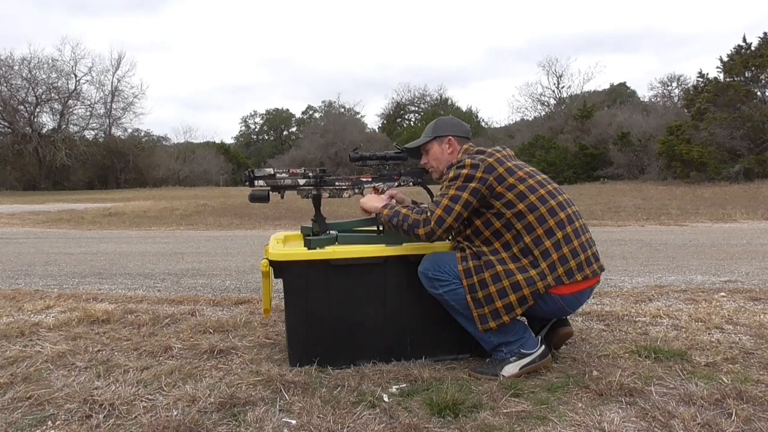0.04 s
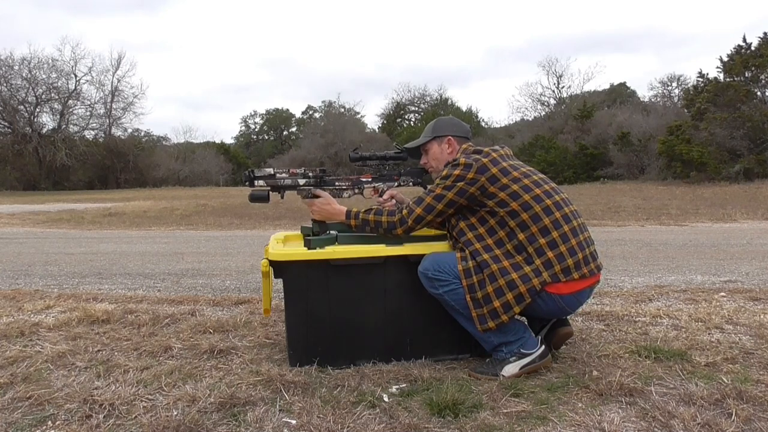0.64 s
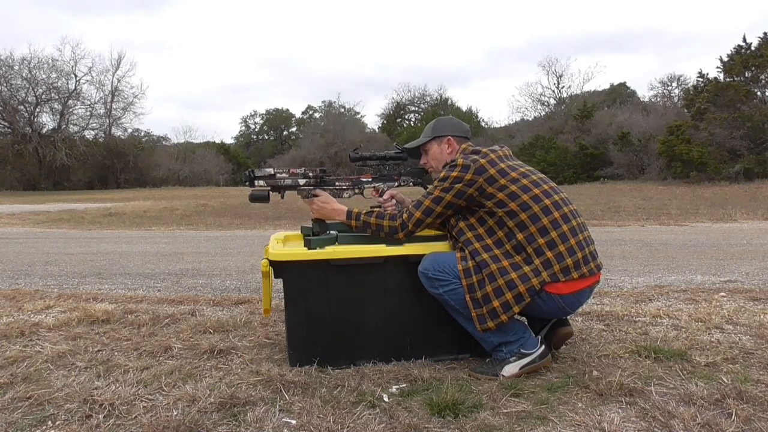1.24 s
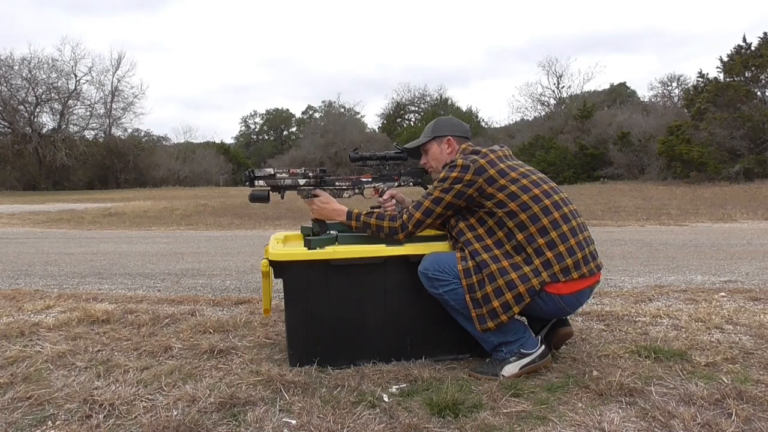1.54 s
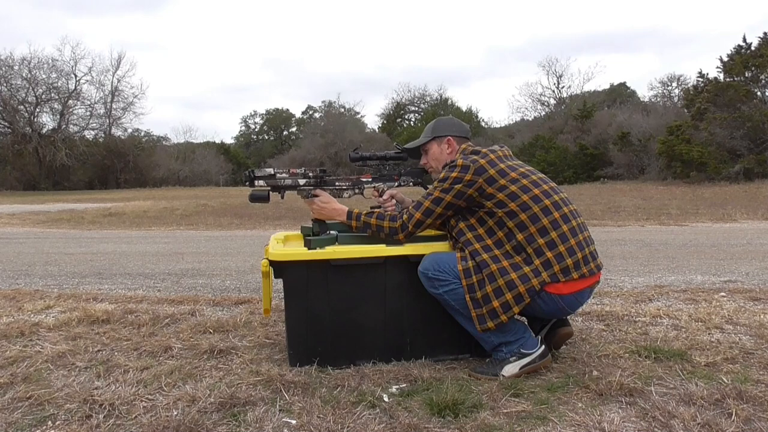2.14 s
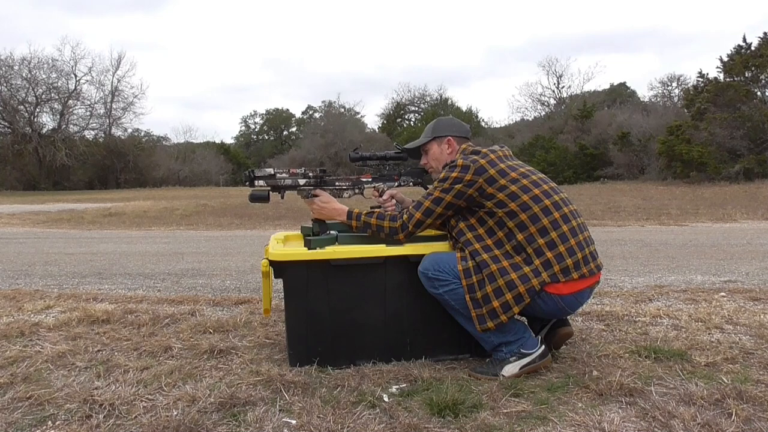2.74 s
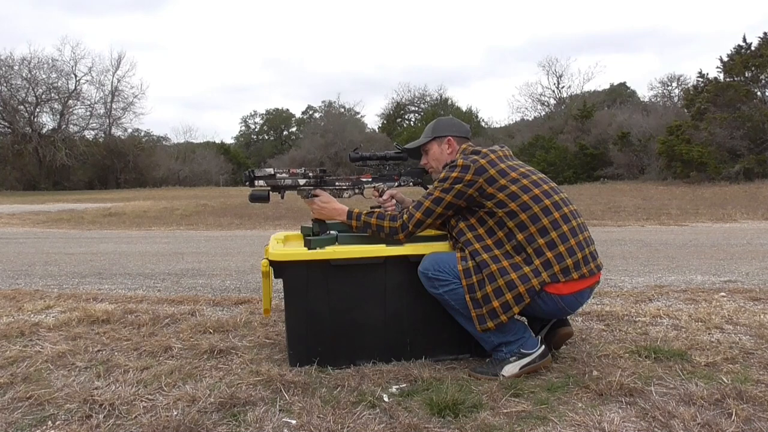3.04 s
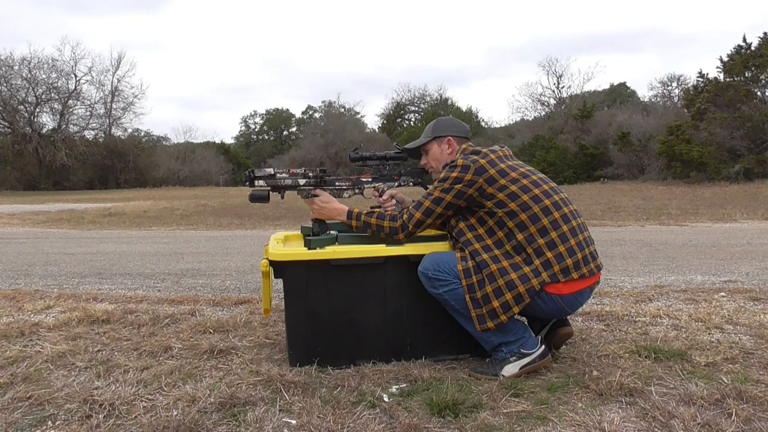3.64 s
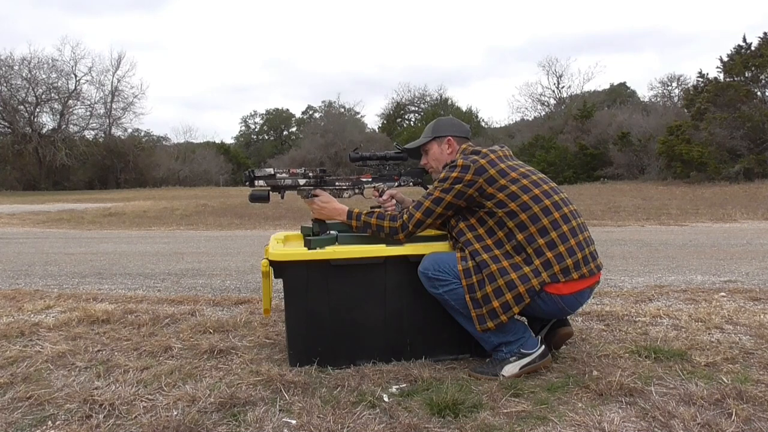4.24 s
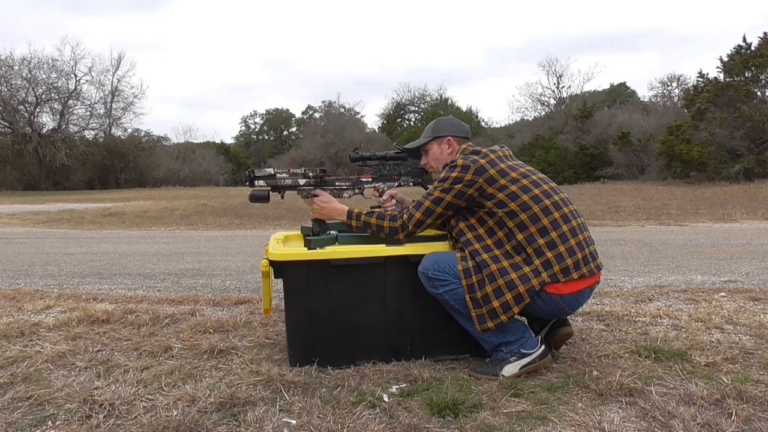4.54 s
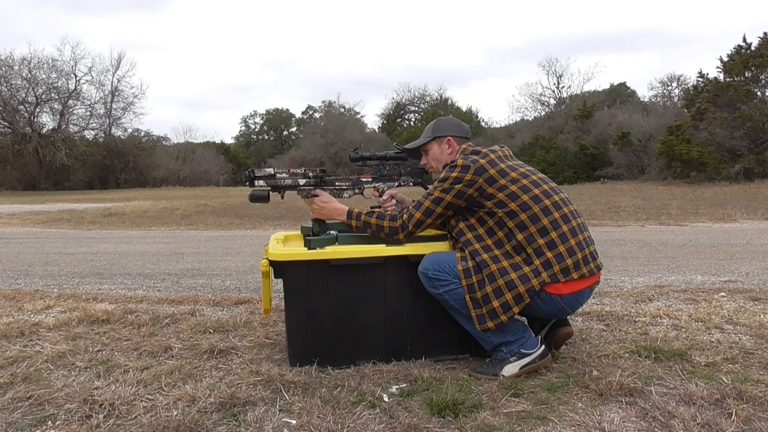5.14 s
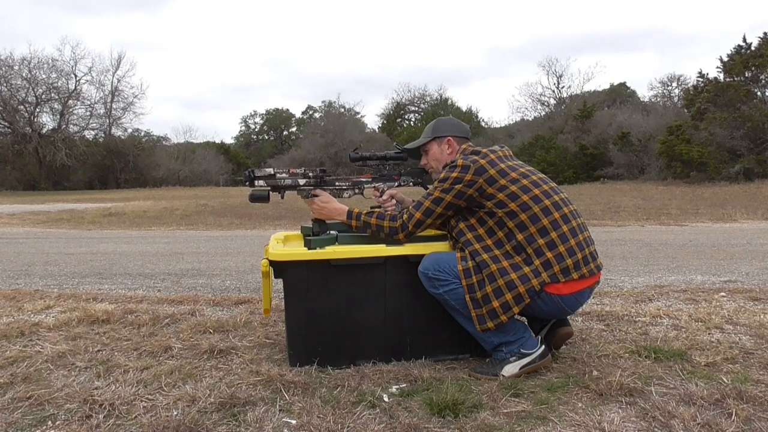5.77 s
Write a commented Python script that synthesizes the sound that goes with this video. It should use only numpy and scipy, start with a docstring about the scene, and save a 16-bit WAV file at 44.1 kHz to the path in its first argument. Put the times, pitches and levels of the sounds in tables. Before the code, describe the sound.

Engine hum and tyre noise fade gently in the open air until a nearby crossbow shoots once with a bright snap and thump.

```python
"""A vehicle drones on a country road off to the right, then slowly recedes: exhaust harmonics over
throbbing rumble and tyre noise. A second engine revs briefly, clothing rustles close by on the right,
and a small bird chips, echoed by the trees. At the very end a crossbow fires, a few metres ahead:
quick impacts excite the modes of latch and rail in a bright snap, and those of the limbs in a thump."""
import sys
import numpy as np
from scipy import signal
from scipy.fft import rfft, irfft
from scipy.io import wavfile

SR = 44100
rng = np.random.default_rng(int(sys.argv[2]) if len(sys.argv) > 2 else 0)


def digitize_waveform(pressure):
    """Quantize a signal to 16-bit integers and store it at the path in sys.argv[1].

    Rows of a 2-D input are taken as channels; values are limited to [-1, 1].
    """
    field = np.atleast_2d(pressure).T
    bounded = np.clip(field, -1, 1)
    quanta = np.round(bounded * 32767).astype(np.int16)
    wavfile.write(sys.argv[1], SR, quanta)


N = 260532
TIME = np.arange(N) / SR

# broad surges of the vehicle's noise: t/s, rasp gain/dB, tyre gain/dB, half-width/s
NOISE_SURGES = [(0.043, 8.5, 2.5, 0.57), (1.966, 4.5, 1.5, 0.31), (2.9, 0.5, 2, 0.95)]


def amp(db):
    """Amplitude ratio of a level in decibels."""
    return 10 ** (np.asarray(db) / 20)


def unit(x):
    """Normalisation to rms 1."""
    return x / np.sqrt(np.mean(x ** 2) + 1e-20)


def read(points, hz):
    """Interpolation on a logarithmic frequency axis."""
    f, value = np.transpose(points)
    return np.interp(np.log(hz + 1), np.log(f + 1), value)


def hold(start_s, length_s, attack_s, release_s):
    """Trapezoidal envelope: rise, plateau and fall to silence."""
    age = TIME - start_s
    return np.clip(age / attack_s, 0, 1) * np.clip((length_s - age) / release_s, 0, 1)


def bump(s, half_s):
    """Gaussian envelope of height 1 around time s."""
    return np.exp(-((TIME - s) / half_s) ** 2)


def burst(s, decay_s, rise_s=0.00049):
    """Impact envelope: quick rise, exponential decay."""
    age = np.maximum(TIME - s, 0)
    return (1 - np.exp(-age / rise_s)) * np.exp(-np.minimum(age / decay_s, 20))


def wander(rate_hz):
    """Random fluctuation: low-pass Gaussian noise of rms 1."""
    hz = np.fft.rfftfreq(N, 1 / SR)
    return unit(irfft(rfft(rng.standard_normal(N)) * np.exp(-(hz / rate_hz) ** 2), N))


def noise(spectrum, coherence=None):
    """Partially coherent stereo noise of rms 1; the spectrum sets only its colour."""
    # likeness of the channels for sound from one side: f/Hz, coherence (0-1)
    lateral_coherence = [(60, 1), (220, 0.87), (430, 0.65), (700, 0.7), (1000, 1), (1600, 0.72),
                         (2500, 0.2), (5000, 0.42), (10000, 0.35), (14000, 0)]
    hz = np.fft.rfftfreq(N, 1 / SR)
    a, b = rfft(rng.standard_normal((2, N)))
    same = np.clip(read(lateral_coherence if coherence is None else coherence, hz), 0, 1)
    mid, side = a * np.sqrt(1 + same), b * np.sqrt(1 - same)
    return unit(irfft(np.array([mid + side, mid - side]) * amp(read(spectrum, hz)), N))


def hiss(level_db=-70, whine_hz=12100, whine_db=-81):
    """Self-noise of the microphones: nearly incoherent, but for one narrow band that both share."""
    # self-noise spectrum: f/Hz, relative density/dB
    floor = [(1180, -35), (2000, 3), (2200, 3), (2420, -8.5), (3710, -2), (4260, -4.5), (4640, -3.5),
             (5240, -9), (6220, -9), (8260, 0), (10600, 0.5), (11400, 1.5), (12100, -2.5), (12900, 1),
             (15600, -9.5)]
    band = [(whine_hz + df, db) for df, db in [(-700, -60), (-250, -7), (0, 0), (250, -7), (700, -60)]]
    broadband = amp(level_db) * noise(floor, [(2000, 0.11), (14000, 0.087)])
    return broadband + amp(whine_db) * noise(band, [(whine_hz, 0.9)])


def bird(sweep=0.2, settle_s=0.0076, rasp=0.03, twigs_db=-3, twigs_s=0.016, trees_db=-7, trees_t60=0.62):
    """Frequency modulation gives raspy upswept chips; twigs scatter them, the tree line reverberates."""
    # chips: t/s, level/dB, top f/Hz, duration/s
    chips = [(0.101, -65.5, 7500, 0.045), (1.589, -53, 7680, 0.049), (1.972, -70, 7500, 0.031),
             (3.672, -69.5, 7670, 0.044), (5.056, -74, 7800, .024)]
    song = np.zeros(N)
    for s, db, top_hz, length in chips:
        age = np.clip(TIME - s, 0, length)
        hz = top_hz * (1 - sweep * np.exp(-age / settle_s)) * (1 + rasp * wander(700))
        song += amp(db) * np.sin(np.pi * age / length) * np.sin(2 * np.pi * np.cumsum(hz) / SR)
    t = TIME[:SR // 2]
    twigs, trees = rng.standard_normal((2, 2, len(t)))
    echo = amp(twigs_db) * unit(twigs * np.exp(-t / twigs_s))
    echo += amp(trees_db) * unit(trees * amp(-60 * t / trees_t60))
    return song + signal.fftconvolve(song[None], echo / np.sqrt(len(t)), axes=1)[:, :N]


def doublings(nearest_s=0.92, road_m=30.9, speed_m_per_s=15.6):
    """Straight-line motion: the vehicle's distance, in doublings of its closest approach."""
    return np.log2(np.hypot(1, speed_m_per_s * (TIME - nearest_s) / road_m))


def cycle_hz():
    """Fundamental of the departing engine: its rate of working cycles."""
    # engine speed: t/s, cycle rate/Hz
    speed = [(0, 15.4), (.5, 15.0), (1.5, 15.25), (1.8, 15.68), (3.0, 15.75), (3.35, 16.72), (5.9, 16.82)]
    return np.interp(TIME, *np.transpose(speed))


def tyres(roar_db=-52, roar_loss_db=4, fizz_db=-67, fizz_loss_db=7.5, flutter_db=1.1):
    """Rolling noise dulls with range: the treble loses more per doubling of distance."""
    # mid-range roar and treble fizz: f/Hz, relative density/dB
    roar = [(200, -24), (330, -20), (400, -5), (500, -3), (580, 0), (710, 1), (1020, 0.5), (1310, -4.5),
            (1600, -13.5), (2000, -29), (2700, -46)]
    fizz = [(1200, -7), (1900, -1), (2700, -6.5), (3550, -5.5), (4100, -8), (5000, -9), (5800, -15),
            (9000, -14), (15000, -47)]
    away = doublings()
    surge_db = sum(db * bump(s, half_s) for s, _, db, half_s in NOISE_SURGES)
    rolling = amp(roar_db - roar_loss_db * away) * noise(roar)
    rolling += amp(fizz_db - fizz_loss_db * away) * noise(fizz)
    return amp(surge_db + flutter_db * wander(16.4)) * rolling


def exhaust_noise(level_db=-51, rumble_loss_db=1.7, rasp_loss_db=1.5, lumps_db=1.0, throb_db=1.0):
    """Amplitude modulation: exhaust noise throbs once an engine cycle and weakens with distance."""
    # deep rumble and the rasp above it: f/Hz, relative density/dB
    rumble = [(20, -23), (36, -34), (47, -4), (65, 7), (100, 6), (150, 2.5), (185, 5), (230, -18.5),
              (400, -45)]
    rasp = [(90, -9), (150, 8.5), (210, 3.5), (260, 1.5), (320, -5), (420, -11), (700, -44.5)]
    away = doublings()
    surge_db = sum(db * bump(s, half_s) for s, db, _, half_s in NOISE_SURGES)
    rumble_db = level_db - rumble_loss_db * away + lumps_db * wander(2.4)
    rasp_db = level_db - rasp_loss_db * away + surge_db
    throb = amp(throb_db * np.cos(2 * np.pi * np.cumsum(cycle_hz()) / SR))
    return throb * (amp(rumble_db) * noise(rumble) + amp(rasp_db) * noise(rasp))


def engine(strong_orders=(5, 8, 11, 13), strong_waver=0.14, weak_waver=0.6, jitter=0.0031):
    """Harmonic series of the engine cycle; moving air makes each order waver; most fade with range."""
    # exhaust harmonics: order, level when nearest/dB, loss per doubling of distance/dB
    orders = [(3, -65.5, -2.5), (5, -46.5, 4), (6, -61, 2), (7, -58, 6), (8, -48.5, .3), (9, -61, -1.2),
              (10, -60.5, 1.2), (11, -46.5, 15.5), (13, -48, 22), (15, -59.5, 18), (20, -70.5, -0.5)]
    # brief swells and dips of single orders: t/s, order, gain/dB, half-width/s
    swells = [(.6, 5, -5.5, 0.4), (1.3, 5, -3.5, 0.41), (2.1, 5, 1.5, 0.49), (3.65, 9, 8.5, 0.21),
              (3.95, 8, -15, 0.46), (4.586, 5, -8, 0.3), (4.9, 5, 9, 0.22)]
    phase = 2 * np.pi * np.cumsum(cycle_hz() * (1 + jitter * wander(7.2))) / SR
    away, out = doublings(), np.zeros(N)
    for order, db, loss_db in orders:
        swell_db = sum(gain * bump(s, half_s) for s, k, gain, half_s in swells if k == order)
        waver = strong_waver * wander(18.0) if order in strong_orders else weak_waver * wander(3.8)
        level = amp(db - loss_db * away + swell_db) * (1 + waver)
        out += level * np.cos(order * phase + 2 * np.pi * rng.random())
    return np.sqrt(2) * out


def revving(start_s=0.66, attack_s=0.073, level_db=-46, blip_db=7, sag_db_per_s=2.5, overtone_db=-13):
    """Pitch follows firing rate: a second engine opens with a blip, climbs and eases off."""
    low_hz, top_hz, settled_hz = 121.2, 165.5, 147.4
    climb_s, settle_s = 0.58, 0.5
    age = np.maximum(TIME - start_s, 0)
    climb = np.sin(np.pi / 2 * np.minimum(age / climb_s, 1))
    settle = np.sin(np.pi / 2 * np.clip((age - climb_s) / settle_s, 0, 1)) ** 2
    hz = low_hz + (top_hz - low_hz) * climb - (top_hz - settled_hz) * settle
    phase = 2 * np.pi * np.cumsum(hz * (1 + 0.014 * wander(8.5))) / SR
    note = np.cos(phase) + amp(overtone_db) * np.cos(1.5 * phase)
    level = amp(level_db + blip_db * bump(start_s + attack_s, half_s=0.037) - sag_db_per_s * age)
    envelope = hold(start_s, length_s=1.6, attack_s=attack_s, release_s=0.3)
    return np.sqrt(2) * level * envelope * (1 + 0.26 * wander(19)) * note


def clothing(slide_db=-62.5, grain_db=1.0, swish_db=-69):
    """Sliding friction: clothing rustles close by, with an airy swish and small catches."""
    # friction spectrum: f/Hz, relative density/dB
    cloth = [(900, -3), (2000, 5.5), (3000, 0.5), (3550, 5.5), (4500, -0.5), (5100, 1), (5900, -2),
             (7500, -1), (10000, -6), (13000, -11), (16000, -19)]
    airy = [(4000, -25), (8000, 0), (10500, 0), (15000, -18)]
    slide = hold(start_s=0.32, length_s=1.1, attack_s=0.3, release_s=0.18)
    drag = slide * amp(slide_db + grain_db * wander(120)) * noise(cloth)
    return drag + amp(swish_db) * bump(0.6, half_s=0.14) * noise(airy)


def handling():
    """Light impacts of handling, each a band of noise in exponential decay."""
    # ticks and knocks: t/s, level/dB, centre f/Hz, decay time/s
    ticks = [(0.27, -59, 3460, 0.012), (0.333, -57.5, 3270, .005), (.56, -59, 10000, .005),
             (.8, -59.5, 3600, 0.019), (.959, -55, 6000, .003), (1.025, -58.5, 4700, 0.015),
             (1.216, -57, 5800, 0.0087), (1.225, -46, 1240, 0.022), (1.248, -54.5, 1560, 0.034)]
    out = np.zeros((2, N))
    for s, db, hz, decay_s in ticks:
        band = [(hz / 4, -30), (hz * 0.56, -5), (hz, 0), (hz * 1.23, -5), (hz * 2, -30), (hz * 4, -60)]
        out += amp(db) * burst(s, decay_s) * noise(band)
    return out


def ring(modes, s, contact_s):
    """Modal superposition: damped modes struck at time s build up over the contact time."""
    age = np.clip(TIME - s, 0, 0.5)
    swing = sum(amp(db - 60 * age / t60) * np.cos(2 * np.pi * hz * age) for hz, db, t60 in modes)
    return (1 - np.exp(-age / contact_s)) * swing


def crossbow(crack_s=0.0039, contact_s=0.00047):
    """Impact excitation: the latch snaps open, the string scrapes the rail, the limbs kick the stock."""
    # impacts from latch to limbs: t/s, metal level/dB, crack level/dB, thump level/dB
    blows = [(5.8982, -5, -23, -33), (5.8991, -8, -21, -32), (5.9009, -22, -27, -38),
             (5.9022, -28, -27, -33), (5.9045, -21, -17, -14), (5.9063, -25, -24, -29)]
    # modes of latch and rail, then of limbs and stock: f/Hz, relative level/dB, T60/s
    metal_modes = [(2300, -21, 0.028), (3780, -15, 0.033), (4400, -18.5, 0.017), (5590, -19.5, 0.017),
                   (7100, -5.5, 0.022), (7700, -6.5, 0.011), (8450, -0.5, 0.014), (9320, -1, 0.007),
                   (10440, -3, 0.014), (12350, -7, 0.0054), (15100, -17, .007)]
    limb_modes = [(310, -1, 0.049), (660, -23, 0.014), (930, 2, 0.032), (1337, -5, 0.067)]
    # crack of the scraping string: f/Hz, relative density/dB
    crack_spectrum = [(150, -10), (400, -1), (700, -3), (1000, 9.5), (1800, -11), (2400, -0.5), (2900, -5),
                      (3700, -6.5), (5600, -6), (7500, -3), (10500, -5), (13000, -15), (16000, -13)]
    scrape = noise(crack_spectrum, coherence=[(1000, 0.95), (12000, 0.87)])
    out = np.zeros((2, N))
    for s, metal_db, crack_db, thump_db in blows:
        out += amp(metal_db) * ring(metal_modes, s, contact_s)
        out += amp(crack_db) * burst(s, crack_s, contact_s) * scrape
        out += amp(thump_db) * ring(limb_modes, s, contact_s)
    return out


def from_right(x):
    """Path difference and acoustic shadow: sound from the right reaches the left late and shaded."""
    # delay at the left microphone: f/Hz, lag/ms
    lag = [(90, 0.5), (250, 0.3), (1000, 0.25), (2200, 0.16), (2900, 0.094), (9000, 0.046)]
    # shadow of the body that carries the microphones: f/Hz, left minus right level/dB
    shadow = [(80, .5), (250, 0), (430, -2), (700, -4), (1200, -6), (2000, -8.5), (3000, -10.5),
              (5200, -7.5), (7000, -3.5), (9500, 0), (14000, -1.5)]
    hz = np.fft.rfftfreq(2 * N, 1 / SR)
    lag_s = read(lag, hz) / 1000
    shade = amp(read(shadow, hz) / 2)  # half the difference goes to each side
    response = np.array([shade * np.exp(-2j * np.pi * hz * lag_s), 1 / shade])
    return irfft(rfft(x, 2 * N) * response)[:, :N]


def scene():
    """Superposition in open air: traffic, clothing and handling on the right, the crossbow ahead."""
    traffic = tyres() + exhaust_noise() + engine() + revving()
    return hiss() + bird() + from_right(traffic + clothing() + handling()) + crossbow()


def record(dry):
    """Band limiting by a linear-phase low-pass filter."""
    edge_hz = 15850
    lowpass = signal.firwin(511, edge_hz, window=("kaiser", 9), fs=SR)
    return signal.oaconvolve(dry, lowpass[None], "same", axes=1)


dry = scene()
out = record(dry)
digitize_waveform(out)
```